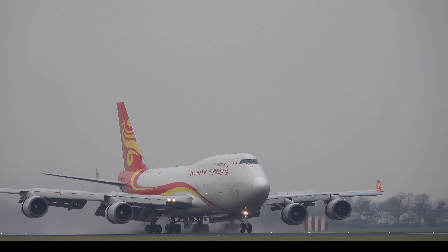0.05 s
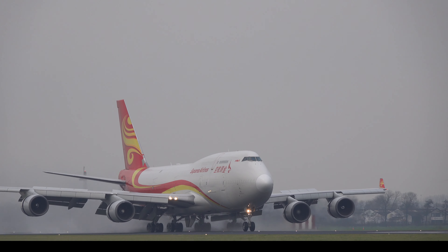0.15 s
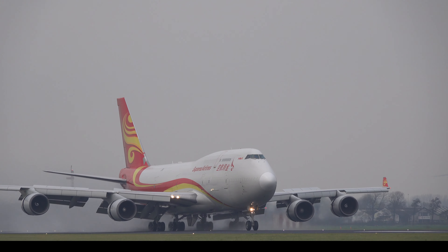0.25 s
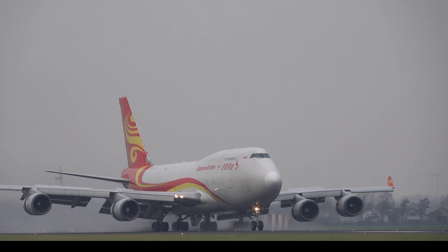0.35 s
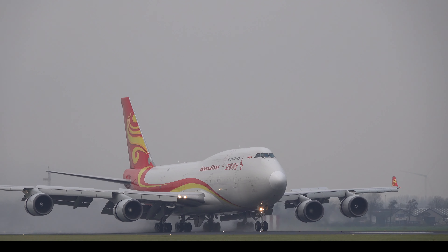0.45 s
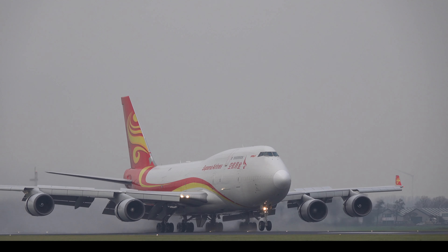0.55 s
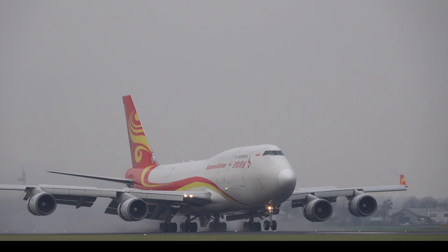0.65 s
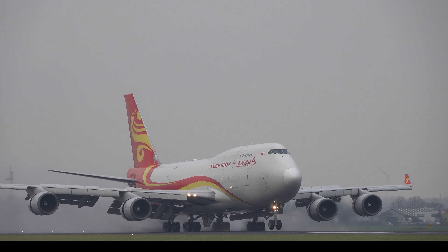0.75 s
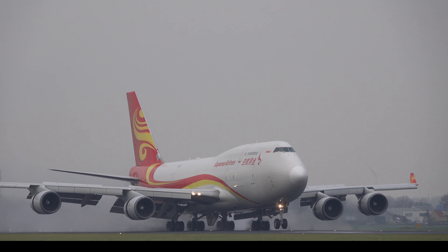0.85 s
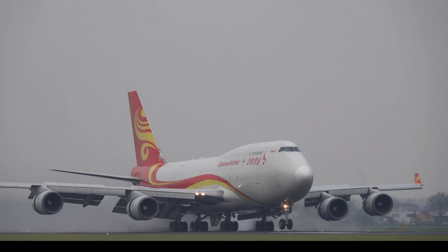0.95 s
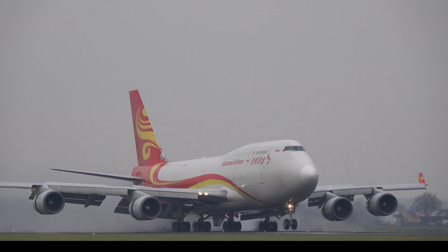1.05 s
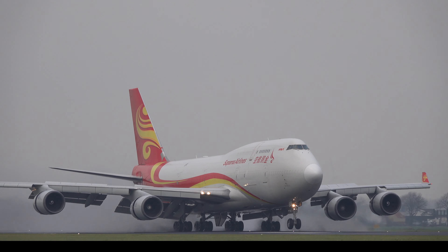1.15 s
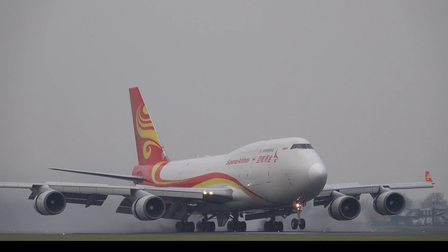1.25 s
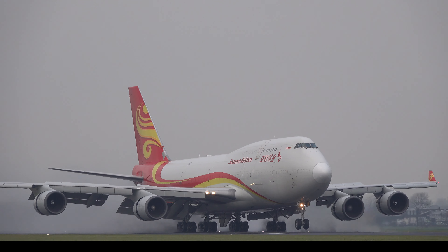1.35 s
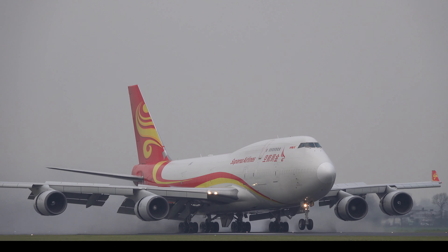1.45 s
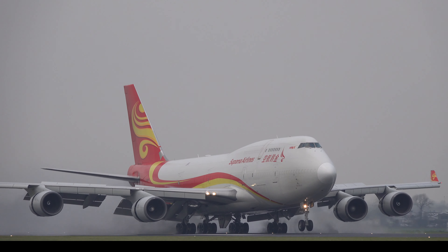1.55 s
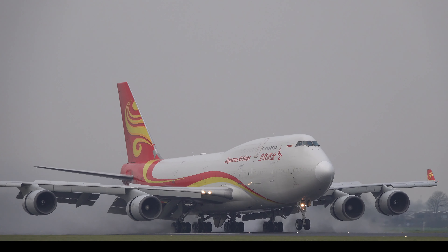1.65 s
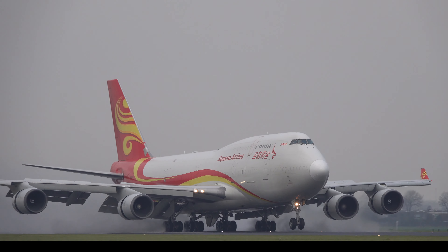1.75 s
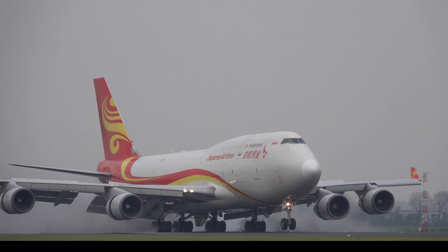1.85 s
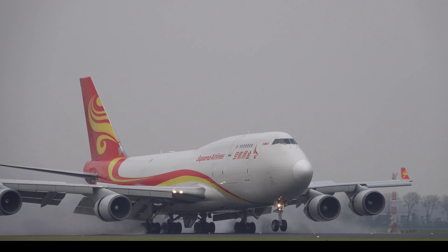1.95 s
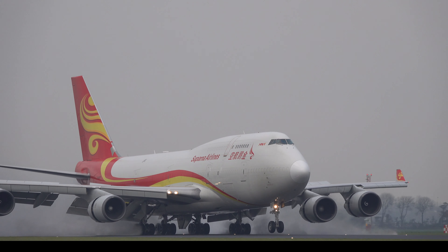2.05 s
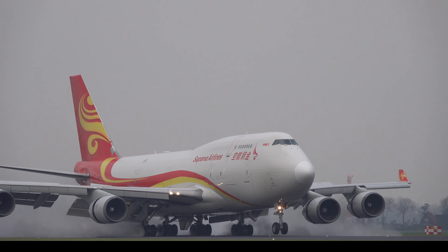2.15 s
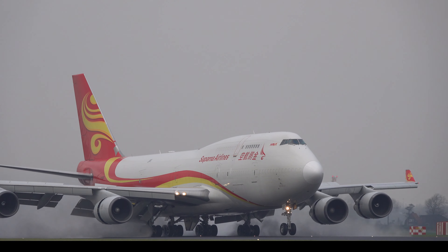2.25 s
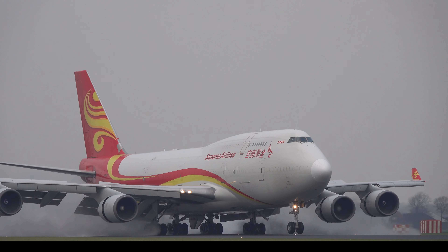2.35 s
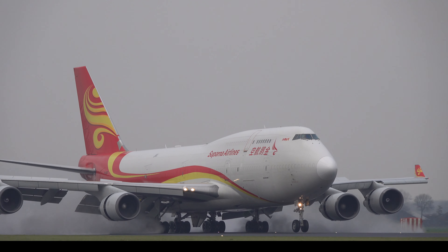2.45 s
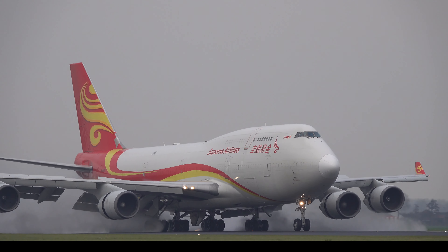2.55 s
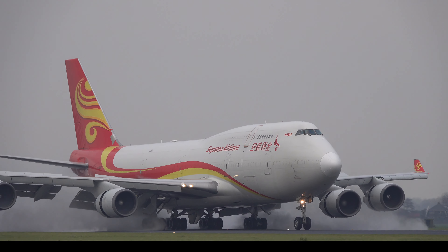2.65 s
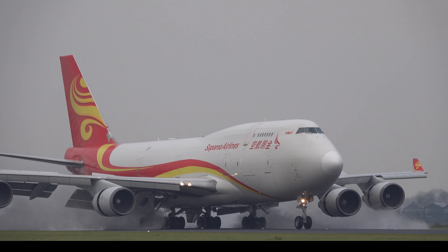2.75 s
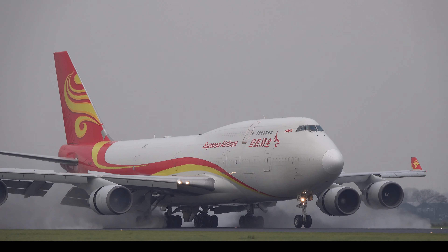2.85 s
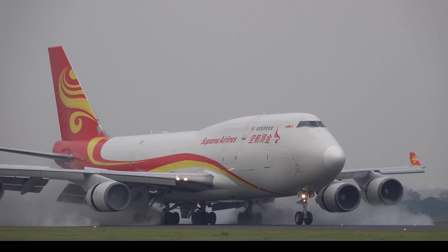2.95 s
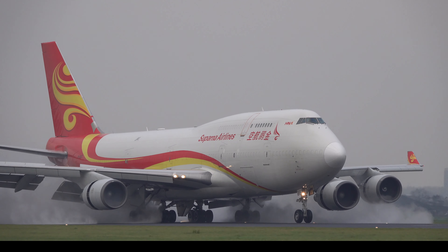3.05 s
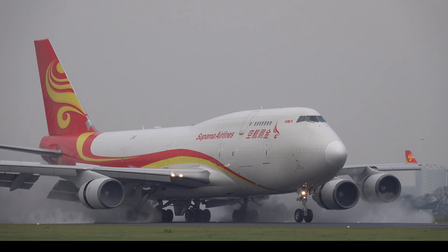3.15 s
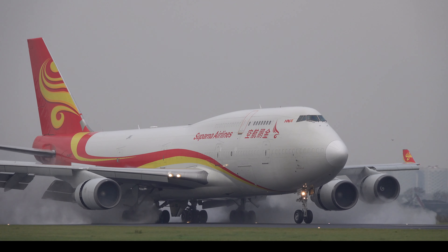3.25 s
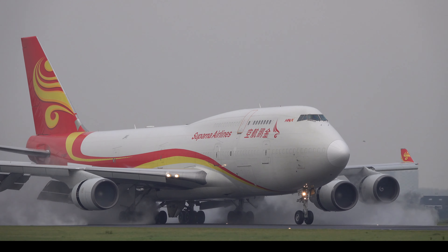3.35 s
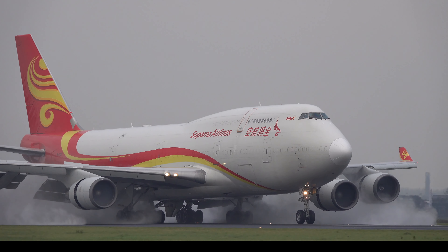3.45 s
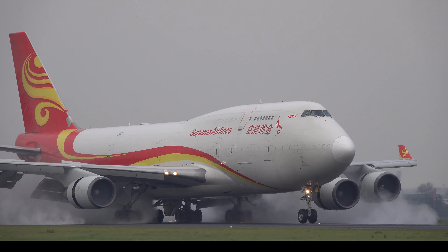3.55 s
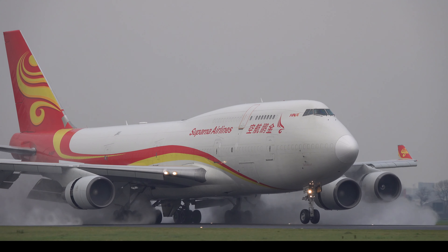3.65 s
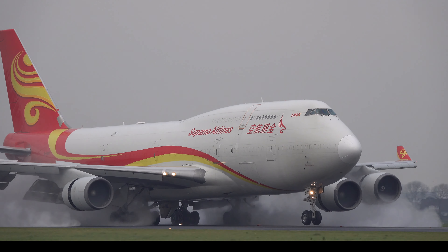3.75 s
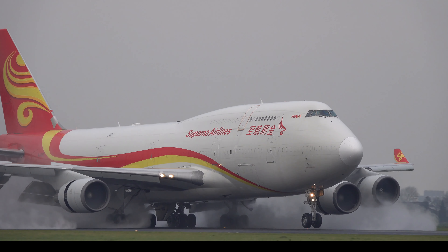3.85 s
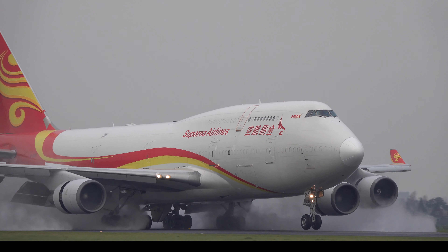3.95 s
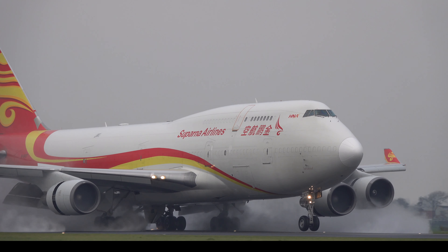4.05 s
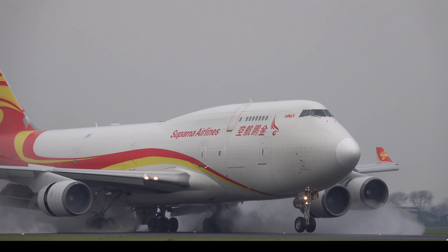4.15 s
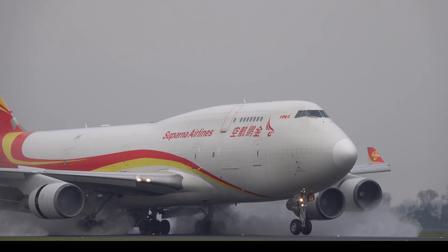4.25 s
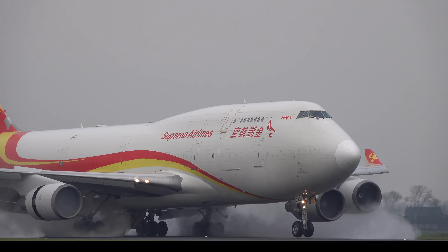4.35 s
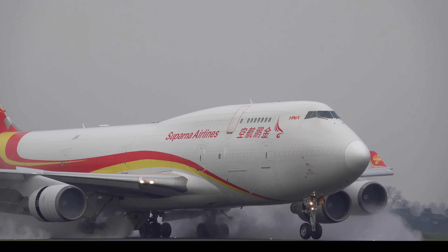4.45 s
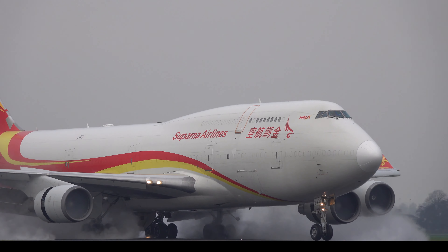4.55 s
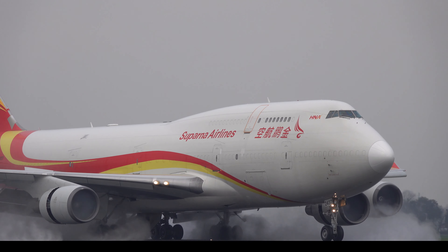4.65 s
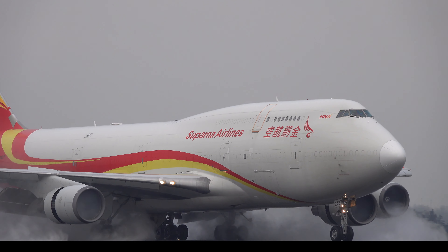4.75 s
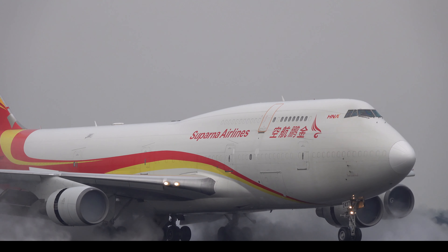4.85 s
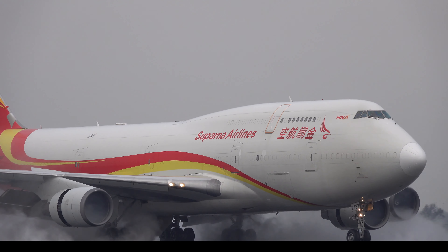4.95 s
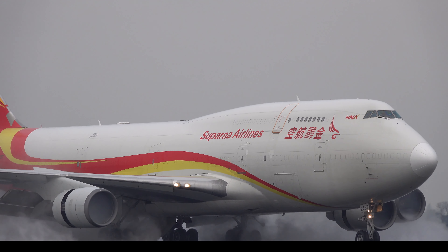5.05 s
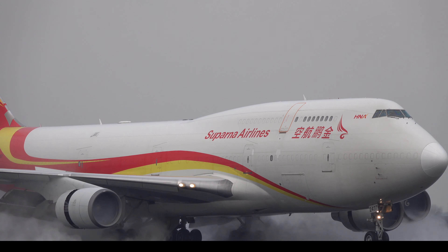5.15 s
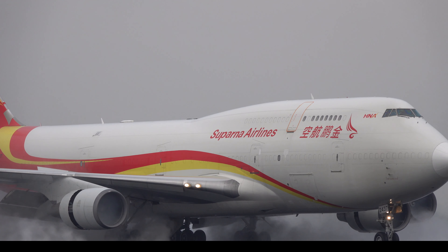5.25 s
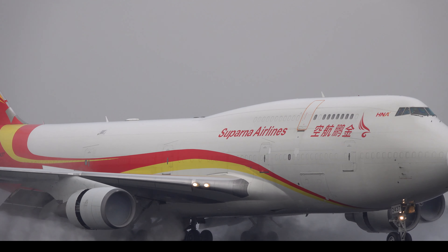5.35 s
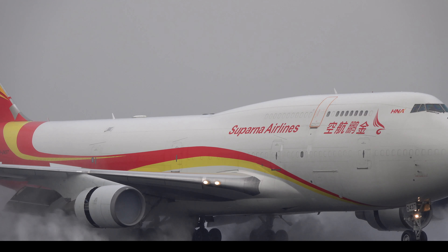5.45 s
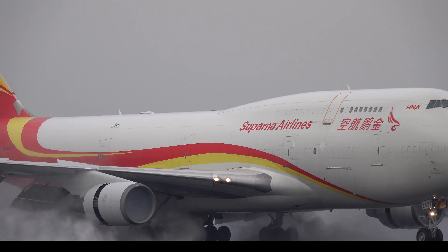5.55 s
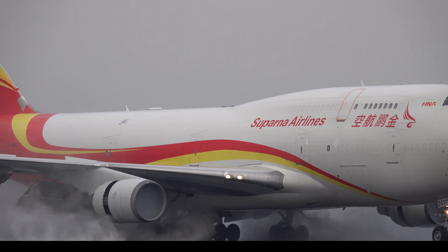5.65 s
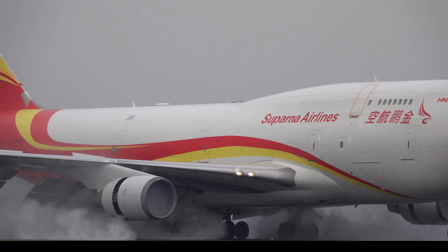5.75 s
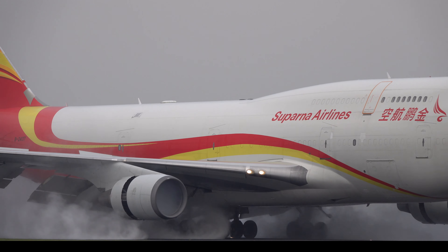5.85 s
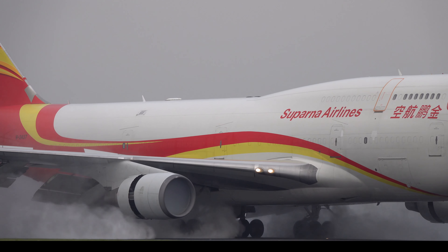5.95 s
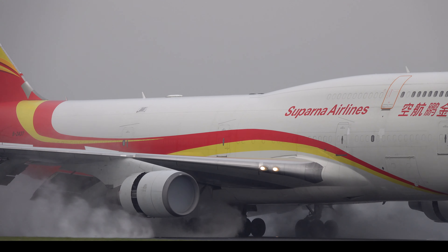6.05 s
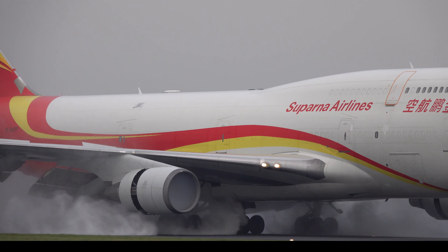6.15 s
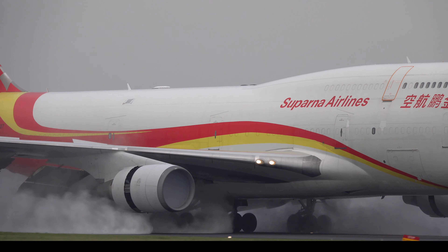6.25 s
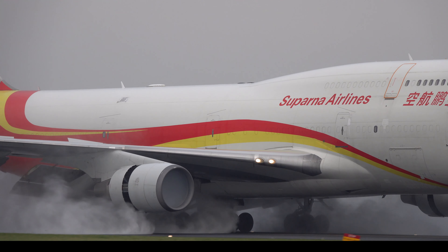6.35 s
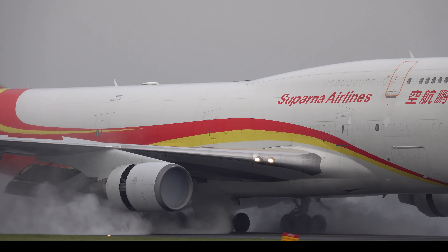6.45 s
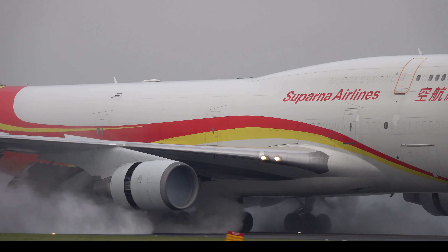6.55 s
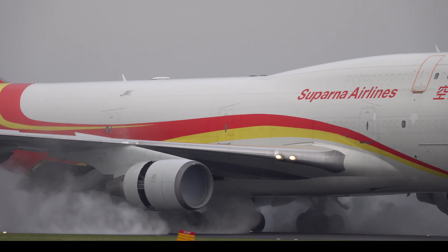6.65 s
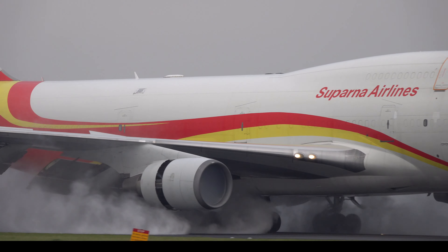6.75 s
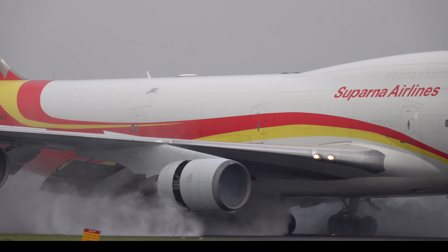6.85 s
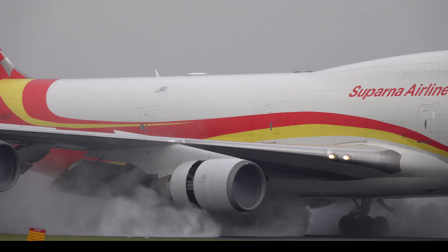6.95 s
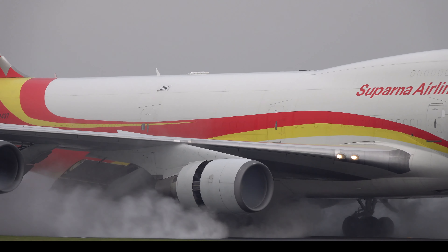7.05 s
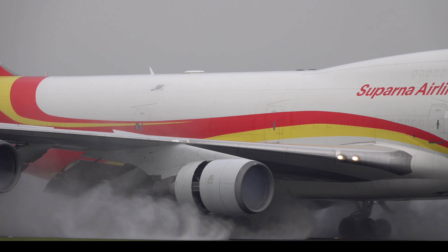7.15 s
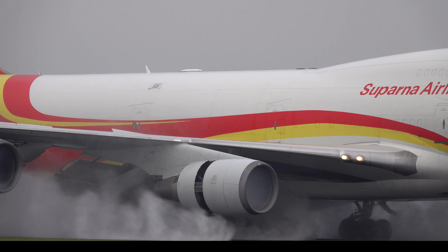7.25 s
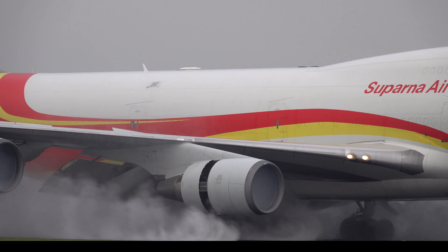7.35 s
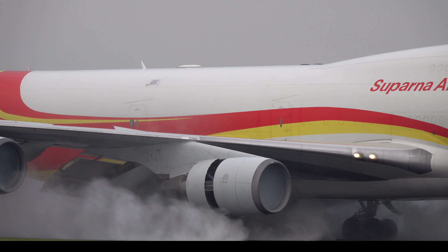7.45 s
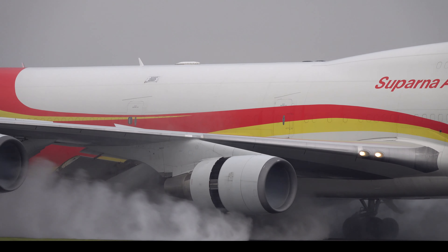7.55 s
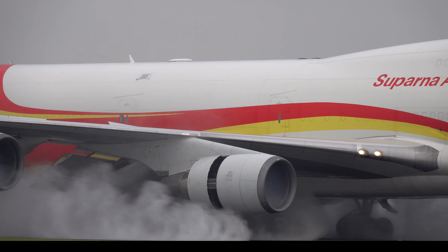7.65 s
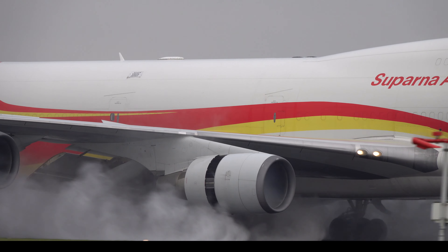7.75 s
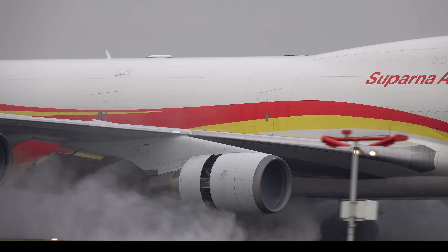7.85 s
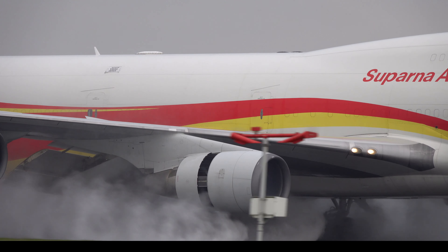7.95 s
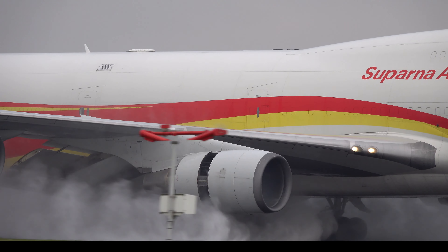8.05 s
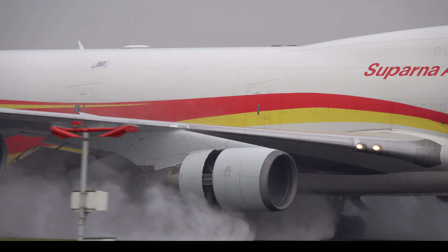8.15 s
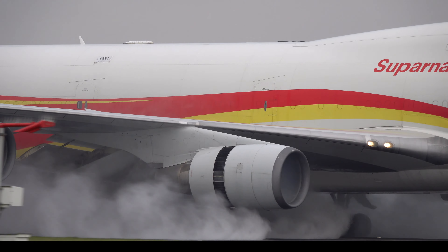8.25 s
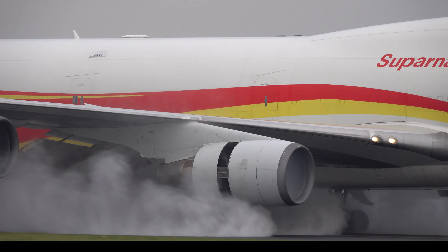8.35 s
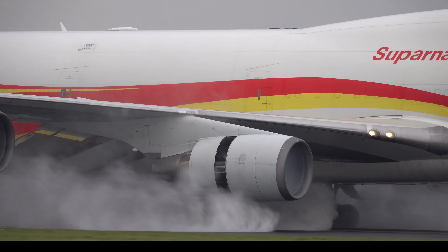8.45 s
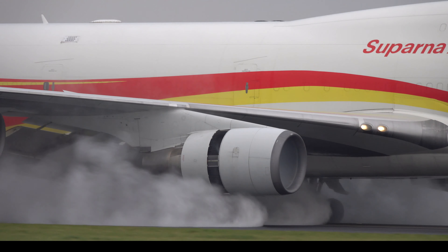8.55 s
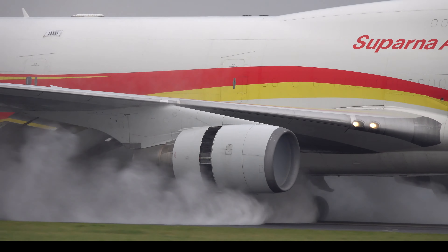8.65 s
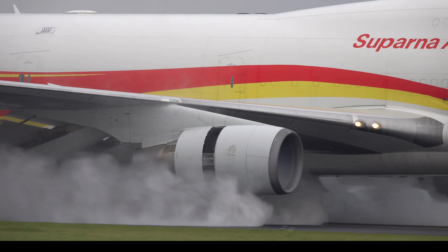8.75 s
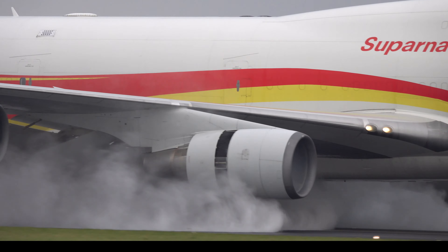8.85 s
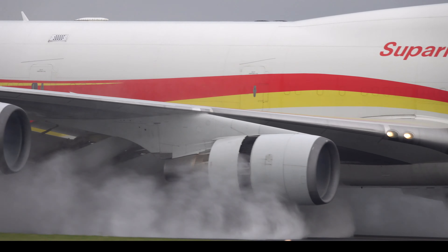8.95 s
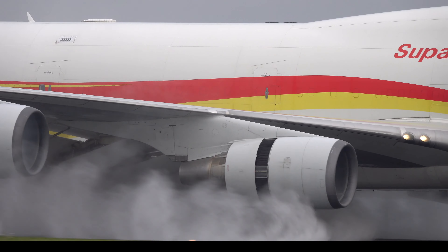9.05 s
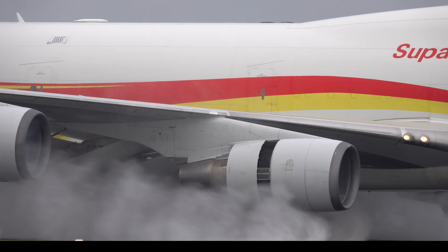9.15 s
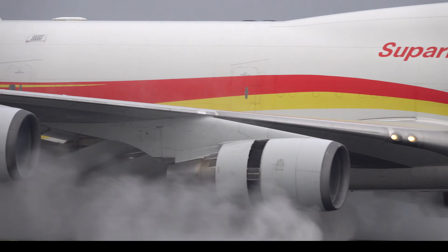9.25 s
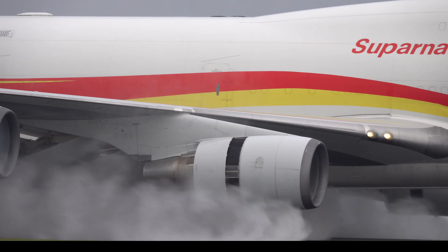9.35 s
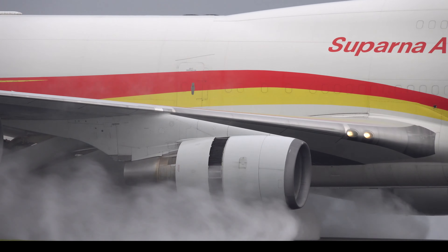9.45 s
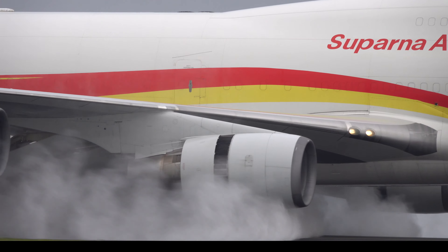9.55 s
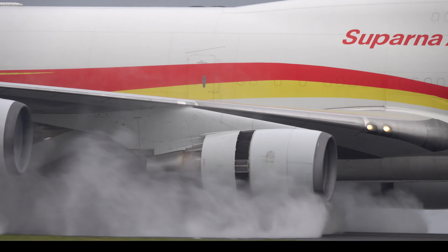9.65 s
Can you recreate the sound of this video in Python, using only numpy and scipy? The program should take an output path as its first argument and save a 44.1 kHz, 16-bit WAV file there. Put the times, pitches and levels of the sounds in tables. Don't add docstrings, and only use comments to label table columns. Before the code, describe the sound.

Wind buffets a microphone as distant jet engines whine upward, then swell into a loud, bright, rushing reverse-thrust roar with a fuzzy blade tone.

```python
import sys
import numpy as np
from scipy import signal
from scipy.fft import rfft, irfft, next_fast_len
from scipy.io import wavfile
from scipy.ndimage import uniform_filter1d

SR = 44100
rng = np.random.default_rng(int(sys.argv[2]) if len(sys.argv) > 2 else 0)


def elevation(decibels):
    levels = np.asarray(decibels, float)
    return 10 ** (levels / 20)


def waveform_to_disk(signal):
    frames = np.transpose(np.atleast_2d(signal))
    scaled = np.clip(frames, -1, 1) * 32767
    samples = np.round(scaled).astype(np.int16)
    wavfile.write(sys.argv[1], SR, samples)


N = 428211
HOP = 128
TIMES = np.arange(N // HOP + 9) * HOP / SR

# (time [s], level of 2.4-4.5 kHz [dB])
ROAR_DB = [(0, -49), (.5, -48), (.97, -42.5), (2.05, -40.5), (3.05, -37.5), (3.3, -39.5), (3.6, -38),
           (3.9, -35), (4.6, -35.5), (5.4, -31.5), (5.76, -29), (6.44, -24.5), (6.95, -27), (7.52, -33.5),
           (7.9, -29.5), (8.5, -28.5), (9.2, -22), (9.71, -21)]


def evened(x):
    return x / np.sqrt(np.mean(abs(x) ** 2) + 1e-20)


def colour(points, hz):
    f, value = np.transpose(points)
    return np.interp(np.log(hz + 1), np.log(f + 1), value)


def curve(rows, t):
    s, value = np.transpose(rows)
    return np.interp(t, s, value)


def flutter(lo_hz, hi_hz, t):
    rates_hz = np.geomspace(lo_hz, hi_hz, num=30) * rng.uniform(.9, 1.1, size=30)
    cycles = np.outer(t, rates_hz) + rng.random(size=30)
    return evened(np.cos(2 * np.pi * cycles) @ rates_hz ** -.3)


def patches(bins, tall, long):
    field = rng.standard_normal((len(TIMES), bins)).T
    field = uniform_filter1d(field, tall, axis=0)
    return evened(uniform_filter1d(field, long, axis=1))


def noise_pair(db, lo_hz, hi_hz, level_db, same, lead_rad=0.):
    frame = 2 * (len(db) - 1)
    hz = np.fft.rfftfreq(frame, 1 / SR)
    a, b, c, d = rng.standard_normal(db.shape[::-1] + (4,)).T
    same = np.clip(same, -1, 1)
    left = a + 1j * b
    right = same * left + np.sqrt(1 - same ** 2) * (c + 1j * d)
    z = np.array([left, right * np.exp(-1j * lead_rad)])
    mid_power = elevation(2 * db) * (1 + same * np.cos(lead_rad)) / 2
    steady = uniform_filter1d(mid_power[(hz >= lo_hz) & (hz < hi_hz)].sum(0), size=40)
    z *= elevation(db + level_db) * np.sqrt(3 / 4 / steady)
    return signal.istft(z, nperseg=frame, noverlap=frame - frame // 4)[1][:, :N]


def bump(t, s, rise_s, fall_s):
    return np.exp(-((t - s) / np.where(t < s, rise_s, fall_s)) ** 2)


def churn_db(t):
    # (time [s], depth [dB], recovery [s])
    fades = [(.19, 1, 0.043), (.45, 7, 0.028), (.81, 3, 0.072), (2.13, 6, 0.054), (2.81, 4.5, .04),
             (3.1, 3.5, 0.085), (3.38, 5, 0.049), (3.62, 2, 0.086), (3.9, 5.5, .03), (4.0, 1.5, .02),
             (4.09, 5, 0.064), (4.32, 5, 0.038), (4.5, 1.5, 0.018), (4.62, 6, 0.02), (4.78, 6.5, 0.013),
             (5.38, 2, .03), (5.57, 3, .03), (5.67, 2.5, 0.078), (6.271, 9, 0.019), (6.314, 6.5, 0.065),
             (6.77, 2, 0.018), (6.97, 2.5, 0.029), (8.14, 2.5, 0.023), (8.33, 1.5, 0.19), (8.79, 2, 0.17),
             (9.0, 2, .06), (9.19, 1, .04), (9.36, 1, .06)]
    # (time [s], gain [dB], build-up [s])
    flares = [(.08, 2.5, .05), (1.68, 1, 0.12), (1.92, 1.5, .1), (3.07, 1.5, 0.14), (3.87, 3, 0.026),
              (3.97, 3.5, .02), (4.05, -0.5, .02), (4.57, 2, 0.034), (6.25, 0, .03), (6.84, 1.5, 0.047),
              (8.0, 2, 0.011), (8.71, 2, 0.1), (9.13, 0.5, .05)]
    fast_s = 0.018
    fade_db = sum(db * bump(t, s, fast_s, slow_s) for s, db, slow_s in fades)
    flare_db = sum(db * bump(t, s, slow_s, fast_s) for s, db, slow_s in flares)
    return flare_db - fade_db


def lull_db(t):
    # (time [s], depth [dB], half length [s])
    lulls = [(0, 5, 0.044), (0.22, 3.5, 0.038), (0.399, 8, 0.022), (0.674, 8, 0.016), (.75, 4, 0.013),
             (0.883, 7, .03), (0.957, 16, 0.026), (1.045, 12, 0.046), (1.18, 6, 0.023), (1.37, 10, 0.024),
             (1.586, 21, 0.16), (1.816, 5, .02), (1.93, 9, 0.068), (2.157, 9, 0.023), (2.23, 5, .015),
             (2.3, 6, 0.017), (2.387, 11, 0.04), (2.525, 6, 0.022), (2.606, 6, 0.027), (3.232, 5.5, 0.014),
             (3.948, 5.5, 0.041), (4.345, 4, 0.021), (5.315, 2, 0.028), (5.424, 8, 0.026),
             (5.503, 8, 0.035), (5.613, 10, 0.019), (5.84, 8.5, 0.16), (6.46, 11, 0.11), (6.785, 3, 0.04)]
    return -sum(db * np.exp(-((t - s) / half_s) ** 4) for s, db, half_s in lulls)


def hiss():
    # (time [s], depth [dB])
    hiss_under_db = [(0, 37), (.9, 43), (1.7, 38), (3.05, 47.5), (3.3, 52.5), (9.71, 56)]
    hz = np.fft.rfftfreq(4 * HOP, 1 / SR)
    roar_db = curve(ROAR_DB, TIMES)
    busy = np.interp(roar_db, [-39, -30], [0, 1])
    specks = np.minimum(patches(len(hz), 2, 8), 1.2)
    db = colour([(5000, -6.0), (9000, 5.5), (15000, 1.0)], hz)[:, None] + (.6 + 9 * busy) * specks
    db -= busy * np.clip((hz[:, None] - 14600) / 15, 0, 50)
    level_db = roar_db + 1.6 * churn_db(TIMES) - curve(hiss_under_db, TIMES)
    level_db += (.8 + 1.5 * busy) * flutter(3.3, 25, TIMES)
    level_db = np.minimum(level_db, -79) - 25 * np.clip(TIMES - 7.8, 0, 1)
    return noise_pair(db, 11900, 15000, level_db, .5)


def drops():
    # (time [s], peak [dB], frequency [Hz], half length [s])
    drop_ticks = [
        (0.4644, -37, 2010, 0.0004),
        (3.279, -27, 1600, .0007),
        (3.306, -27, 2100, 0.0005),
        (3.329, -26.5, 1500, 0.00061),
        (3.363, -29, 2300, .0005),
        (3.3794, -28, 1700, 0.00045),
        (3.41, -25, 2470, 0.0004),
        (3.4376, -35, 2150, 0.0004),
        (3.4525, -24.5, 2160, 0.00065),
    ]
    out, t = np.zeros(N), np.arange(-80, 200) / SR
    for s, db, hz, half_s in drop_ticks:
        at = round(s * SR)
        out[at - 80:at + 200] += elevation(db + 3) * np.exp(-(t / half_s) ** 2) * np.cos(2 * np.pi * hz * t)
    return out


def wind():
    # (time [s], level [dB])
    gust_db = [(0, -44.5), (.8, -43), (1.3, -45), (1.9, -45), (2.7, -42), (3.2, -40.5), (3.5, -41),
               (4.7, -41), (5.6, -41), (6.25, -45), (7, -42), (7.8, -41), (9, -41.5), (9.2, -46.5),
               (9.71, -50.5)]
    # (frequency [Hz], density [dB per Hz])
    wind_tone = [(20, -22), (60, -26), (120, -3.5), (260, -22.5), (360, 6), (480, -10), (660, 1),
                 (1000, -8.5), (1800, -2.5), (3500, -47)]
    # (time [s], rise over the gust [dB], length [s])
    buffets = [(.05, 5, .008), (.113, 5, .008), (.166, 9, .005), (.29, 8, .005), (.342, 13, .014),
               (.372, 7, .008), (.44, 6, .006), (.466, 6, .005), (.535, 10, .014), (.572, 5, .005),
               (.603, 4, .006), (.73, 4, .008), (.79, 7, .018), (.84, 5, .006), (.98, 6, .006),
               (1.115, 14, .009), (1.25, 6, .012), (1.41, 4, .01), (2.08, 8, .025), (2.27, 7, .01),
               (2.35, 4, .015), (2.57, 4, .01), (2.73, 5, .015), (3.19, 4, .02), (3.28, 4, .02)]
    hz = np.fft.rfftfreq(4 * HOP, 1 / SR)
    broken = np.clip((3.6 - TIMES) / 0.85, 0, 1)
    buffet_db = sum(db * np.exp(-((TIMES - s) / length_s) ** 2) for s, db, length_s in buffets)
    between = np.exp(-buffet_db / 4)
    lumps_db = (1.33 + 2.6 * broken) * between * flutter(15, 90, TIMES)
    reach_oct = np.clip(np.log2(np.maximum(hz, 450) / 450), 0, 2.5)[:, None]
    db = colour(wind_tone, hz)[:, None] + lumps_db
    db = db + broken * reach_oct * (0.81 * buffet_db - 8.0) + 0.95 * patches(len(hz), 5, 6)
    db -= np.maximum(hz - 3500, 0)[:, None] / 100
    same = colour([(100, 1.0), (300, 0.42), (700, 0.5), (1500, 0.22)], hz)[:, None]
    lead_rad = np.clip((hz[:, None] - 250) / 350, 0, 1.5)
    level_db = curve(gust_db, TIMES) + lull_db(TIMES) + 0.81 * flutter(3, 15, TIMES)
    level_db += 0.54 * buffet_db - 0.48 * broken
    pair = noise_pair(db, 250, 950, level_db, same, lead_rad)
    eddies = rng.standard_normal((N, 2)).T
    for _ in range(2):
        eddies = uniform_filter1d(eddies, size=70, axis=1)
    depth_db = 1.0 + .8 * np.interp(np.arange(N) / SR, TIMES, broken * between)
    return pair * evened(elevation(depth_db * np.clip(evened(eddies), -3, 1.8)))


def rumble():
    # (time [s], level [dB])
    rumble_db = [(0, -51.5), (1.5, -53), (2.7, -47.5), (5, -51.5), (6.3, -46.5), (7, -45.5), (7.5, -51),
                 (8.7, -48.5), (9.71, -53)]
    # (frequency [Hz], density [dB per Hz])
    rumble_tone = [(15, -3.5), (30, -21.5), (60, -11), (100, -9.5), (170, 0.5), (240, -7.5), (400, -23)]
    hz = np.fft.rfftfreq(16 * HOP, 1 / SR)
    t = np.arange(N // (4 * HOP) + 9) * 4 * HOP / SR
    db = (colour(rumble_tone, hz) - np.maximum(hz - 400, 0) / 8)[:, None] + 0.71 * flutter(4.2, 17, t)
    level_db = curve(rumble_db, t) + 0.24 * lull_db(t) + 1.7 * flutter(1.7, 6.6, t)
    return noise_pair(db, 70, 220, level_db, 0.92)


def roar(shimmer):
    # (time [s], length [m])
    path_m = [(0, 850), (.7, 750), (1.2, 550), (2.9, 386), (3.5, 377), (5, 264), (6.3, 149), (8.4, 53),
              (9, 6.8), (9.71, 2.8)]
    # (frequency [Hz], density [dB per Hz])
    jet_tone = [(300, -34), (700, -21.5), (1030, -25.5), (1400, -13), (2000, -6.5), (2600, -6.5),
                (3760, -10.5), (6000, -12), (9080, -22.5), (11500, -32.5), (13500, -42), (14700, -48),
                (15400, -77)]
    # (frequency [Hz], likeness [0-1])
    likeness = [(100, 0.84), (1200, 0.98), (1970, 1), (3230, 0.89), (5330, 0.94), (8770, 1), (14400, 0.49)]
    # (frequency [Hz], phase [rad])
    left_lead = [(0, 0.36), (860, 0), (1890, 0.12), (3190, 0.59), (5170, -0.0), (6800, 0.74), (8270, 0.44),
                 (14600, 0.1)]
    hz = np.fft.rfftfreq(4 * HOP, 1 / SR)
    khz = hz[:, None] / 1000
    air_m = curve(path_m, TIMES)
    far = air_m / 500
    db = colour(jet_tone, hz)[:, None] - 0.00066 * air_m * khz ** 2.292
    db += (0.7 + 0.043 * far) * shimmer * np.clip(khz / 2.9, 0, 1.3)
    db -= 2.35 * far * np.clip(2.5 - khz, 0, 1.2)
    db += 0.71 * patches(len(hz), 14, 18)
    level_db = curve(ROAR_DB, TIMES) + churn_db(TIMES)
    same, lead_rad = colour(likeness, hz)[:, None], colour(left_lead, hz)[:, None]
    return noise_pair(db, 2400, 4860, level_db, same, lead_rad)


def whistle(hz, width_hz, steady=0.):
    fuzz = rng.standard_normal(len(hz)) + 1j * rng.standard_normal(len(hz))
    r = np.exp(-np.pi * width_hz / SR)
    for _ in range(2):
        fuzz = signal.lfilter([1 - r], [1, -r], fuzz)
    fuzz = evened(fuzz) + steady
    fuzz = fuzz / np.sqrt(uniform_filter1d(abs(fuzz) ** 2, size=3000))
    return np.sqrt(2) * (evened(fuzz) * np.exp(2j * np.pi * np.cumsum(hz) / SR)).real


def fans(shimmer):
    # (time [s], blade tone [Hz])
    fan_hz = [(2.9, 1470), (3.2, 1610), (3.5, 1755), (4, 1972), (4.6, 2225), (5, 2275), (5.5, 2270),
              (7, 2225), (8.2, 2150), (9.71, 2050)]
    # (time [s], level [dB])
    beam_db = [(3.0, -24), (3.45, -10), (3.85, 2), (4.0, 2), (4.15, 0), (4.5, -.5), (4.68, -5), (4.85, -15),
               (5.55, -5), (6.2, -6.5), (7, -8), (8.2, -6.5), (9.15, -7), (9.71, -10)]
    # (multiple [1], level re tone while spooling [dB], level re tone at full speed [dB])
    overtones = [
        (2, -11.5, -19),
        (3, -22, -32),
    ]
    # (idle pitch [Hz], loudest time [s], level [dB], rise [dB/s], fall [dB/s])
    whines = [
        (5880, 2.0, -69, 12, 30),
        (4440, 2.2, -61, 5, 45),
        (3170, 3.0, -52, 10, 18),
        (2800, 0, -57, 10, 30),
    ]
    # (time [s], ratio to idle [1])
    spool = [(0, 1.03), (.5, 1.025), (1.2, 1.0), (1.9, 1.005), (2.45, 1.07), (3.03, 1.29), (3.8, 1.505)]
    t = np.arange(N) / SR
    hz, churn = curve(fan_hz, t), np.interp(t, TIMES, churn_db(TIMES))
    level_db = np.interp(t, TIMES, curve(ROAR_DB, TIMES)) + churn
    level_db += curve(beam_db, t) - 60 * np.clip(beam_db[0][0] - t, 0, 1)
    full = np.clip((t - 3.95) / .7, 0, 1)
    spread = np.clip((t - 4.3) / .5, 0, 1)
    out = np.sqrt(1 - .6 * spread) * whistle(hz, 90, steady=1.0 - .5 * spread)
    out += np.sqrt(.6 * spread) * whistle(hz - 20, 190)
    out *= elevation(level_db + .8 * spread * np.interp(t, TIMES, flutter(6, 25, TIMES)))
    for k, spooling_db, full_db in overtones:
        overtone_db = level_db + spooling_db + full * (full_db - spooling_db) + .7 * churn
        out += elevation(overtone_db) * whistle(round(k) * hz, 150, steady=.3)
    for idle_hz, s, db, rise, fall in whines:
        whine_db = db - np.where(t < s, rise * (s - t), fall * (t - s))
        out += elevation(whine_db) * whistle(idle_hz * curve(spool, t), width_hz=240)
    out *= elevation(1.3 * np.interp(t, TIMES, shimmer))
    other = np.roll(out, 9)
    return np.array([out + .2 * other, out - .2 * other])


def scene():
    # (frequency [Hz], left over right [dB])
    balance_db = [(60, -1), (150, 0.0), (370, 0), (930, -0.5), (2320, 1.5), (5790, 3.5), (14400, -1.5)]
    shimmer = flutter(5, 50, TIMES)
    size = next_fast_len(N)
    hz = np.fft.rfftfreq(size, 1 / SR)
    comb = 1 + .25 * np.clip((hz - 2200) / 1000, 0, 1) * np.exp(-2j * np.pi * hz / 589)
    tilt = elevation(np.outer([.5, -.5], colour(balance_db, hz)))
    jet = irfft(rfft(roar(shimmer) + fans(shimmer), size) * comb * tilt, size)[:, :N]
    drift_db = np.interp(np.arange(N) / SR, [0, 5, 8.5, 9.7], [-.6, -0.27, -.1, 0.74])
    return jet * elevation(np.outer([.5, -.5], drift_db)) + rumble() + wind() + drops()


def thin_treble(x, margin_db, from_hz):
    hz, _, z = signal.stft(x, SR, nperseg=1024)
    power = abs(z) ** 2
    loud_db = 10 * np.log10(uniform_filter1d(power.sum((0, 1)), size=5) + 1e-12)
    bands = np.minimum(np.arange(len(hz)) // 8 * 8 + 4, len(hz) - 1)
    near_db = 10 * np.log10(uniform_filter1d(power, size=8, axis=1)[:, bands] + 1e-20)
    thrift_db = 4.0 * rng.standard_normal(len(loud_db) // 4 + 1).repeat(4)[:len(loud_db)]
    keep = np.clip((near_db - thrift_db - 1.3 * (loud_db + 30.5) + margin_db) / 1.2, 0, 1)
    z = z * np.where(hz[:, None] > from_hz, keep, 1)
    return signal.istft(z, SR, nperseg=1024)[1][:, :N]


def roll_off(x):
    return signal.sosfilt(signal.butter(12, 15720, fs=SR, output="sos"), x)


def record(dry):
    mix = thin_treble(dry, margin_db=103, from_hz=5000) + hiss()
    return roll_off(mix)


dry = scene()
out = record(dry)
waveform_to_disk(out)
```